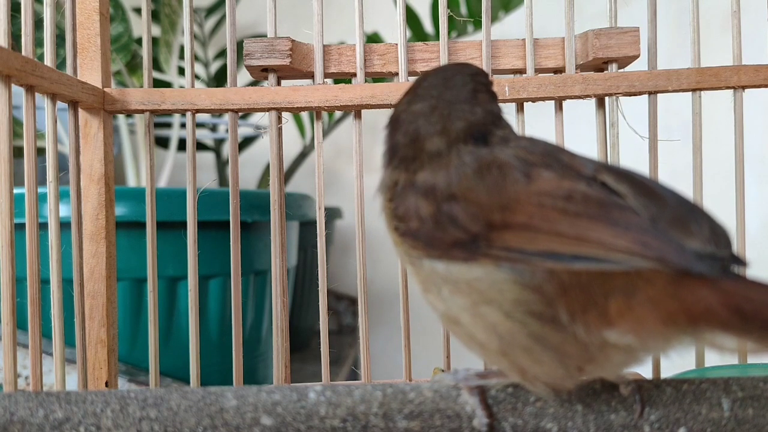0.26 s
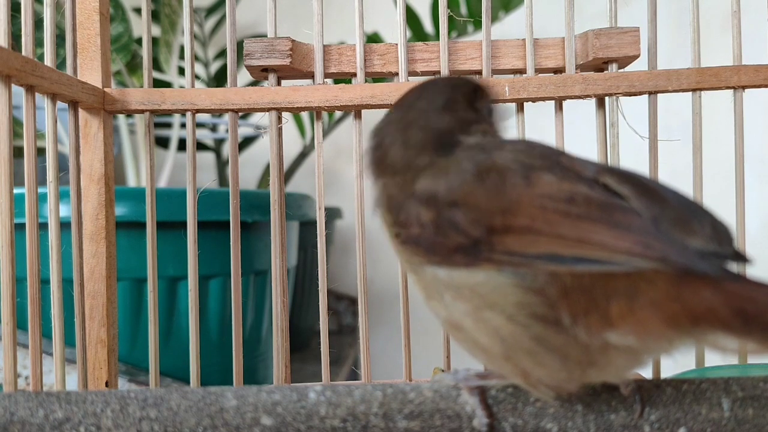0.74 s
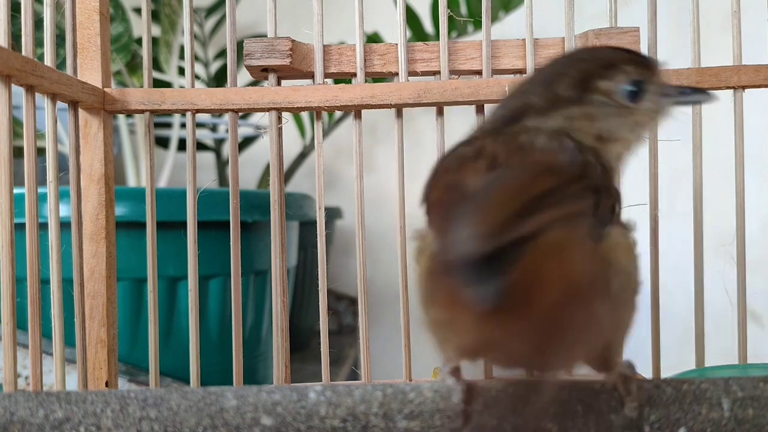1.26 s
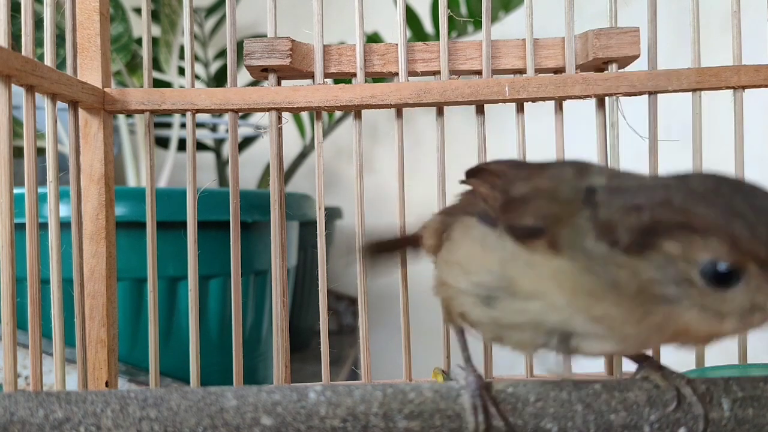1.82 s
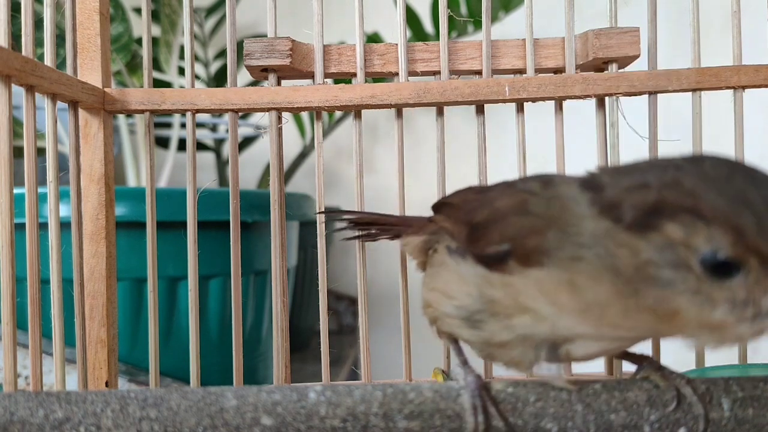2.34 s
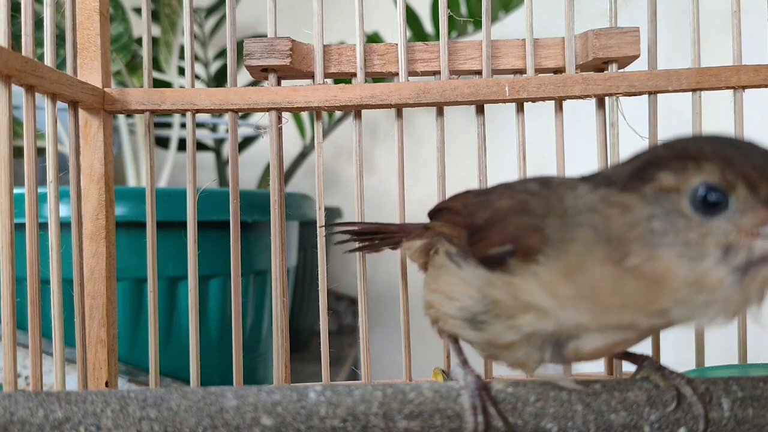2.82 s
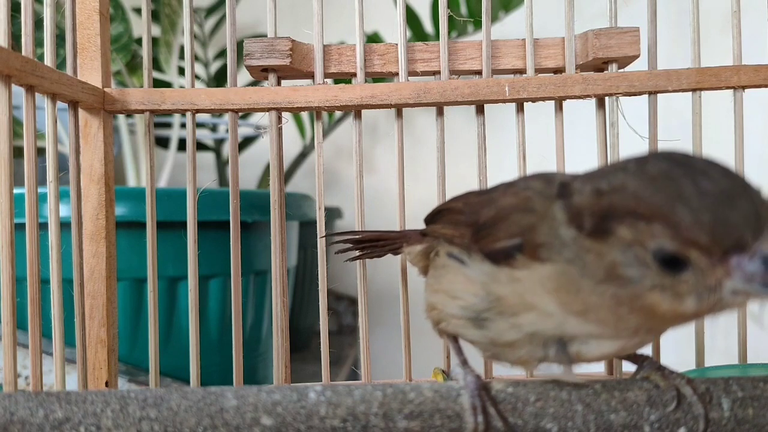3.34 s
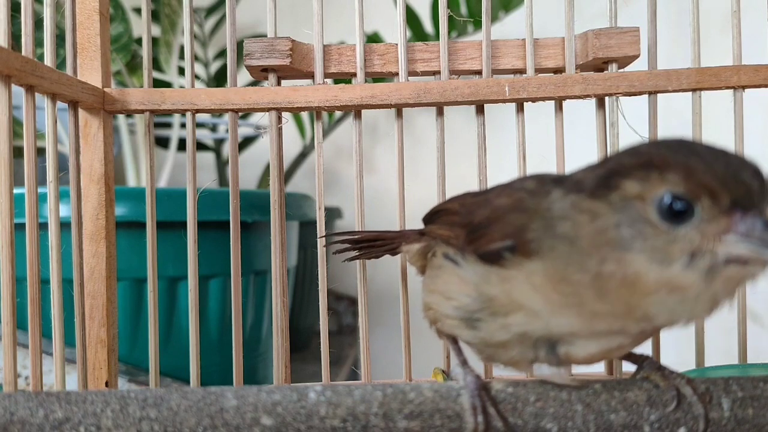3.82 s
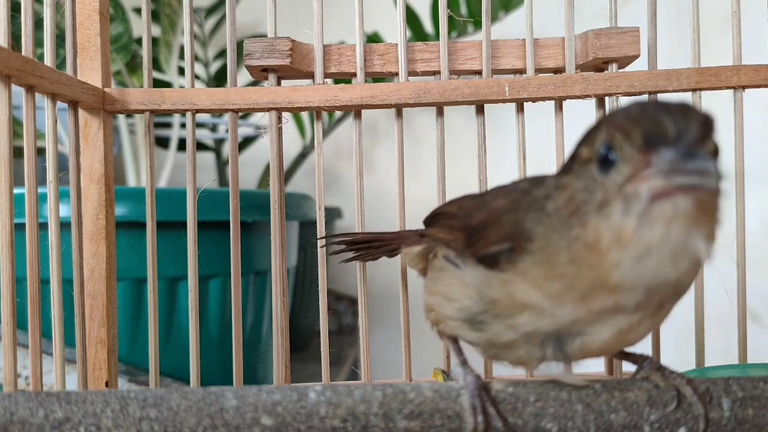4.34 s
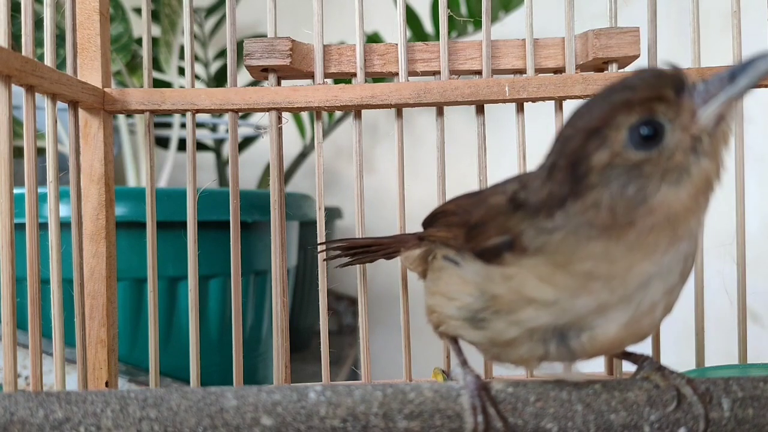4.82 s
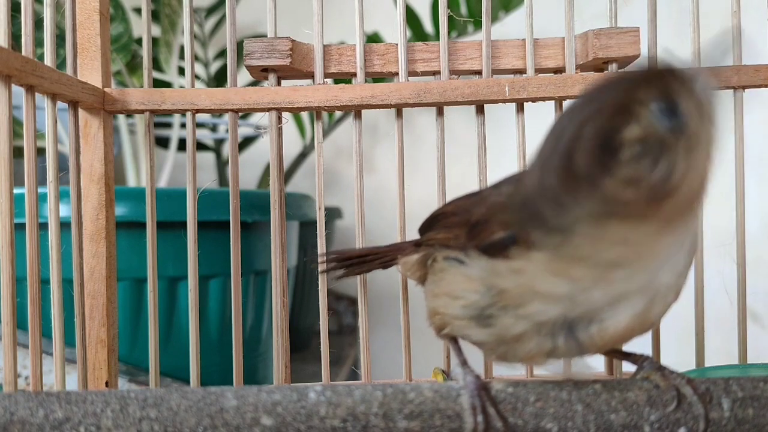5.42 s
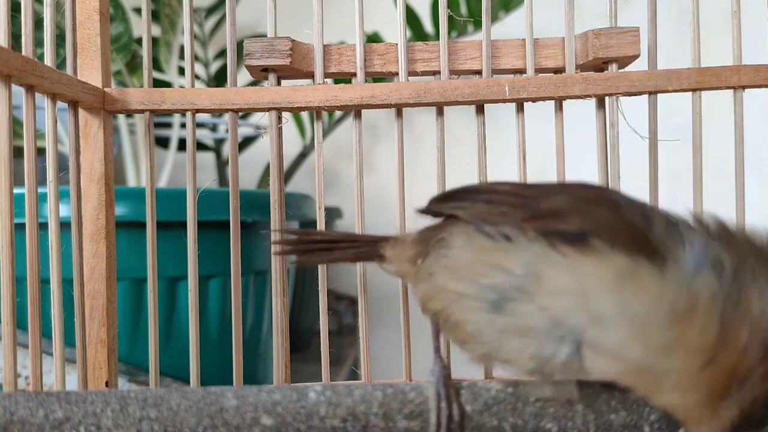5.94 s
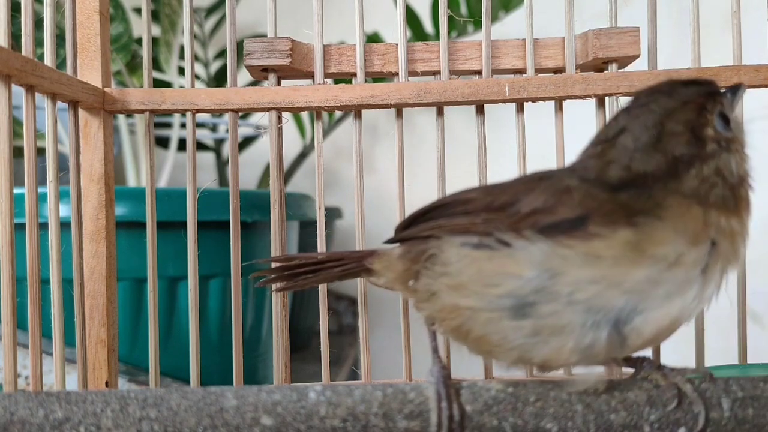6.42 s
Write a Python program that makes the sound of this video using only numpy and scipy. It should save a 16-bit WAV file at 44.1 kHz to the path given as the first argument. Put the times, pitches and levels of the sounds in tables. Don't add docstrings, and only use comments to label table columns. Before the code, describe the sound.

A small caged bird close by bursts into two loud, piercing rattling trills with buzzing ends, over faint distant whistles and low dragging rumbles.

```python
import sys
import numpy as np
from scipy import signal
from scipy.fft import rfft, irfft, next_fast_len
from scipy.io import wavfile
from scipy.ndimage import uniform_filter1d, map_coordinates

SR = 44100
rng = np.random.default_rng(int(sys.argv[2]) if len(sys.argv) > 2 else 0)


def makeup_ratio(level_db):
    decades = np.asarray(level_db, float) / 20
    return 10 ** decades


def unload_wav(signal):
    wavfile.write(
        sys.argv[1],
        SR,
        np.round(np.clip(np.atleast_2d(signal).T, -1, 1) * 32767).astype(np.int16),
    )


N = 294147


def lead_level_db(shelf_hz, shelf_db):
    rest_hz = 2218
    return shelf_db - 11 + 4.5 * np.log2(max(shelf_hz - rest_hz, 50) / 400)


def lead_in(t, hz, gain, note, stress):
    leap_s, lead_s, shelf_hz, _, _ = note
    shelf_db, step_db, _, _, _ = stress
    i = (t > leap_s - lead_s - .002) & (t <= leap_s)
    u = np.clip(1 + (t[i] - leap_s) / (lead_s + 0.0026), 0, 1)
    step_hz = 0.5 * max(shelf_hz - 2600, 0)
    step = .5 + .5 * np.tanh((t[i] - leap_s + .0105) / .0015)
    fresh = gain[(t > leap_s - lead_s - .008) & (t < leap_s - lead_s)].max() < makeup_ratio(-45)
    tied = not fresh
    scoop = min(500 + 4 * step_hz, 1400) * np.exp(-u / 0.065) * fresh
    climb = np.sin(1.3 * u) / np.sin(1.3) if fresh else np.sin(np.pi * u / 2) ** 1.5
    floor_hz = 2220 if fresh else 2330
    falling_hz = (gain[i] > 0) * hz[i]
    rising_hz = floor_hz + (shelf_hz - step_hz - floor_hz) * climb + step_hz * step - scoop
    hz[i] = np.maximum(falling_hz, rising_hz)
    strain_db = np.maximum(hz[i] - 3300, 0) / 85 * (falling_hz < hz[i])
    level_db = lead_level_db(shelf_hz, shelf_db) - strain_db + 3.04 * (u - 3.0) + step_db * (step - 1)
    attack_share = .5 - 0.22 * min(step_hz / 150, 1)
    attack = np.minimum(u / attack_share + .2 * tied, 1) ** 0.87
    gain[i] = np.maximum(gain[i], makeup_ratio(level_db) * attack * makeup_ratio(-1.5 * tied))


def hook(t, hz, gain, note, stress):
    leap_s, lead_s, shelf_hz, top_hz, hook_db = note
    shelf_db, _, leap_db, arc_s, catch_db = stress
    i = (t > leap_s) & (t < leap_s + arc_s)
    u = np.clip((t[i] - leap_s) / arc_s, 0, 1)
    base_hz = shelf_hz + (2350 - shelf_hz) * u
    hz[i] = base_hz + (top_hz - base_hz + 150) * np.sin(np.pi * u ** .8)
    throat_dip_db = 7 * np.exp(-((shelf_hz - 3120) / 280) ** 2)
    burst_db = lead_level_db(shelf_hz, shelf_db) + leap_db + 2.0 - 0.002 * (shelf_hz - 2500.5) - throat_dip_db
    held = makeup_ratio(hook_db - (10 + 1500 * max(lead_s - .0185, 0)) * u)
    gain[i] = held + makeup_ratio(burst_db) * np.exp(-u / 0.057)
    gain[i] += makeup_ratio(catch_db) * np.exp(-((u - .86) / .09) ** 2)
    gain[i] *= np.minimum((1 - u) / 0.07, 1)


# t/s at the top, top f/Hz, level/dB
REBOUNDS = [
    (3.871, 3000, -32),
    (3.973, 3250, -27.5),
    (4.043, 3150, -29),
    (4.345, 3000, -32),
]


def rebound(t, hz, gain):
    half_s, rest_hz = .007, 2218
    for s, top_hz, db in REBOUNDS:
        i = abs(t - s) < half_s
        hump = np.cos(np.pi / 2 * (t[i] - s) / half_s)
        hz[i] = rest_hz + (top_hz - rest_hz) * hump
        gain[i] = makeup_ratio(db) * hump ** 1.5


# first crest t/s, last crest t/s
BUZZES = [
    (3.0465, 3.1042),
    (3.1635, 3.2313),
    (4.494, 4.518),
    (4.568, 4.641),
    (4.7055, 4.7738),
]
# first crest f/Hz, last crest f/Hz, first level/dB, loudest level/dB
EFFORT = [
    (4637, 5200, -18, -8),
    (3920, 5600, -22, -9),
    (4300, 4100, -19, -14.5),
    (4010, 5500, -18, -9),
    (4010, 5600, -19, -10),
]
WAIST_DB = [
    11,
    14,
    25,
    30,
    30,
]


def buzz(t, hz, gain, edge):
    for (first, last), (first_hz, last_hz, first_db, last_db), waist_db in zip(BUZZES, EFFORT, WAIST_DB):
        i = (t > first - .0055) & (t < last + .005)
        u = (t[i] - first) / (last - first)
        done = np.clip(u, 0, 1)
        swings = round((last - first) * 119)
        crest = .5 + .5 * np.cos(2 * np.pi * swings * (u + .05 * u * (1 - u)))
        uneven_hz = 90 * rng.standard_normal(12)[np.clip(u * swings + 1.5, 0, 11).astype(int)]
        crest_hz = first_hz + (last_hz - first_hz) * u
        hz[i] = uneven_hz + 3150 + (crest_hz - 3150) * crest ** .9
        fade = np.clip(np.minimum(t[i] - first + 0.0046, last + .005 - t[i]) / 0.0039, 0, 1)
        spent_db = 11 * crest * (u > 1 - .5 / swings)
        growth_db = (last_db - first_db) * np.clip(1.5 * u, 0, 1) * (0.27 + .7 * crest ** 2)
        dip_db = waist_db * crest * (1 - crest) + 5 * done * (1 - crest) ** 2
        gain[i] = makeup_ratio(first_db + growth_db - spent_db - dip_db) * fade
        gain[i] *= makeup_ratio(1.2 * rng.standard_normal(24)[np.clip(2 * u * swings + 2.5, 0, 23).astype(int)])
        pressed_db = -19.5 + .7 * (last_db + 6) - 6.6 * (last - first < .06)
        edge[i] = makeup_ratio(pressed_db + 19.6 * np.clip(1.8 * u, 0, 1) - 16 * crest + 3 * done)


# t/s of the upward leap, lead-in t/s, shelf f/Hz, top f/Hz, hook level/dB
FIRST_TRILL = [(2.3313, 0.019, 2422, 5310, -33), (2.378, 0.02, 2528, 5970, -27.5),
               (2.4464, 0.02, 3618, 6550, -11.5), (2.516, 0.019, 3790, 6513, -12.5),
               (2.5601, .0259, 3273, 6368, -21.5), (2.6361, 0.021, 3618, 6320, -14.5),
               (2.6809, 0.024, 3239, 6324, -23.5), (2.756, .0175, 3531, 6238, -18),
               (2.7999, .0257, 3101, 6330, -24), (2.8715, 0.019, 3575, 6317, -19.5),
               (2.9164, .0252, 2842, 6190, -25), (2.9888, 0.015, 2990, 6050, -23),
               (3.0264, 0.016, 2515, 5680, -27)]
SECOND_TRILL = [(3.8392, .0187, 2425, 5470, -29.5), (3.8891, .018, 2414, 5560, -26),
                (3.941, .027, 2484, 5854, -26), (4.0137, .0237, 2593, 5730, -20),
                (4.0915, .0225, 3077, 6030, -28), (4.1365, .0262, 2584, 5598, -33),
                (4.2152, .0187, 3000, 5555, -30), (4.262, .0257, 2662, 5596, -32),
                (4.3152, .0264, 2683, 5967, -31), (4.3979, .0185, 3178, 6034, -30),
                (4.442, .023, 2862, 5724, -28), (4.4805, .015, 2475, 5247, -24)]
# shelf level/dB, step up level/dB, leap level/dB, hook length t/s, catch level/dB
FIRST_STRESS = [(-1.1, 3, -2.1, .019, -34), (-1.6, 2, 0.1, .02, -34), (1.1, 8, -1.1, .02, -20),
                (2.1, 9, -2.1, .0175, -20), (1.6, 9, -3.1, .021, -32), (1.1, 9, -1.1, .019, -21),
                (1.1, 9, -3.1, .021, -30), (0.1, 8, -1.1, .02, -22), (0.1, 7, -2.1, .021, -30),
                (0.1, 8, -1.1, .02, -23), (-1.1, 3, 0.1, .021, -30), (1.1, 8, -2.1, .02, -25),
                (-1.1, 0.1, -2.1, .019, -24)]
SECOND_STRESS = [(0.1, 0.1, -2.1, .021, -31), (0.1, 0.1, -1.1, .021, -26), (0.1, 0.1, 0.1, .022, -24),
                 (1.1, 0.1, -4.1, .021, -23), (-0.6, 9, -3.1, .0195, -23), (-1.1, 0.1, -3.1, .02, -34),
                 (-0.6, 6, -2.1, .02, -23), (-1.1, 1.1, -4.1, .02, -18), (0.1, 1.1, -5.1, .021, -27),
                 (-0.6, 12, -3.1, .021, -24), (0.1, 5, 1.1, .024, -20), (-1.1, 0.1, 0.1, .017, -30)]


def syrinx():
    t = np.arange(N) / SR
    hz, gain, edge = np.full(N, 2350.), np.zeros(N), np.full(N, makeup_ratio(-29))
    for note, stress in zip(FIRST_TRILL + SECOND_TRILL, FIRST_STRESS + SECOND_STRESS):
        lead_in(t, hz, gain, note, stress)
        hook(t, hz, gain, note, stress)
    rebound(t, hz, gain)
    buzz(t, hz, gain, edge)
    return uniform_filter1d(hz, size=31), uniform_filter1d(gain, size=25), edge


def second_voice():
    x, u = np.zeros(N), np.linspace(0, 1, int(.032 * SR))
    for s, _, _, _, _ in FIRST_TRILL + SECOND_TRILL:
        hz = 3000 - 997.3 * np.sin(1.25 * np.pi * u ** 1.6 / 2) ** 2 + rng.normal(0, 70)
        level = makeup_ratio(-35 + rng.normal(0, 2))
        x[round((s + .003) * SR):][:len(u)] += level * np.sin(np.pi * u ** .5) * np.sin(turns(hz))
    return x * makeup_ratio(4 * wobble(250))


# f/Hz, width f/Hz, level/dB
THROAT = [
    (3150, 450, 3),
    (5290, 1400, -4),
    (6725, 2000, 0),
]
# f/Hz, level/dB
MIC = [(400, -20.5), (1300, -4), (2400, -1), (7000, -2.5), (8500, 1.5), (10000, -14), (11500, -9.5),
       (13000, -8.5), (15600, -7.5), (16200, -41)]


def bird():
    hz, gain, edge = syrinx()
    phase = turns(hz * (1 + 0.0089 * wobble(500)))
    tone = np.sin(phase)
    tone += edge * np.sin(2 * phase + .8 * wobble(600))
    tone += (makeup_ratio(-30) + edge ** 2.0) * np.sin(3 * phase)
    tone += .3 * edge * np.sin(4 * phase) * (hz < 4500)
    tone += makeup_ratio(-35.5) * np.sin(5 * phase) * (hz < 3600)
    breath = (makeup_ratio(-30.5) + 0.58 * edge) * rng.standard_normal(N)
    voice = makeup_ratio(3.5) * gain * makeup_ratio(.5 * wobble(300)) * (tone + breath) + second_voice()

    def throat(f):
        return makeup_ratio(-2) + sum(makeup_ratio(db) * 1j * f * w / (c * c - f * f + 1j * f * w) for c, w, db in THROAT)

    return filtered(voice, lambda f: throat(f) * makeup_ratio(along(MIC, f)))


# (from t/s, to t/s, left lag/samples), then rows of f/Hz, left level/dB, right level/dB
POSES = [
    ((2.2, 3.14, 2.2), [(2400, -2.5, 2), (3050, -1, -1), (3700, 2, -5), (4500, 1, 1.5), (5400, 2.5, 1), (6400, 4, -3), (7750, -1, 5), (9500, -14, 4), (11700, -3, 0), (14500, 3, 0)]),
    ((3.14, 3.6, 2.7), [(2400, -1, 3), (3050, 0, -1), (3700, 1, -2), (4500, 3, 1), (5400, 5, 3.5), (6400, 11, 3), (7750, 2, 10), (9500, -3, 11), (11700, 2, 10), (14500, -3, -3)]),
    ((3.6, 4.55, 4.4), [(2400, -2.5, 2.5), (3050, -4, -2.5), (3700, 4, 0), (4500, 1, 1.5), (5400, 2.5, 1), (6400, -2, -3.5), (7750, -5, 3), (9500, -11, 3), (11700, -7, 3), (14500, -1, 3)]),
    ((4.55, 5.0, 5.4), [(2400, 1, 2.5), (3050, -4, -6), (3700, -1, 0), (4500, -1, 4), (5400, 6, 5), (6400, 4, -2), (7750, -4, 6), (9500, -10, 10), (11700, -3, 9), (14500, -8, 3)]),
]
# f/Hz, phase/rad
PORTS = [(2400, .3), (3050, -1.2), (3700, 0), (4500, -.4), (5400, -.4), (6400, 0)]


def facing(x):
    t, out, ears = np.arange(N) / SR, np.zeros((2, N)), np.array([[.5], [-.5]])
    for (start, end, lag), colour in POSES:
        def port_response(f):
            gains = makeup_ratio([along([(row[0], row[k]) for row in colour], f) for k in (1, 2)])
            return gains * np.exp(-1j * ears * (2 * np.pi * f * lag / SR + along(PORTS, f)))

        out += filtered(x * ((t >= start) & (t < end)), port_response)
    return out


# f/Hz, density level/dB per Hz
SHEEN = [(5000, -59.5), (7500, -5), (9500, -0.5), (10300, -11.5), (11000, -4.5), (12800, -3.5),
         (13700, -10), (15200, -1), (16000, -39.5)]


def fizz(song):
    loudness = np.sqrt(np.abs(uniform_filter1d(song ** 2, size=1800, origin=600)))
    return makeup_ratio(-15) * loudness ** 2.1 * rush(lambda f: makeup_ratio(along(SHEEN, f)), patchy_db=8)


# delay t/s, level/dB
BARS = [(.0011, -12), (.0023, -4.5), (.0042, -6), (.0068, -11.5), (.0097, -16.5), (.014, -12.5),
        (.019, -19)]


def cage(x):
    delay, db = np.transpose(BARS)
    spread = delay[:, None] * rng.uniform(.8, 1.3, (len(BARS), 2))
    signs = rng.choice([-1, 1], (len(BARS), 2))

    def echoes(f):
        return sum(makeup_ratio(d) * g[:, None] * np.exp(-2j * np.pi * f * s[:, None]) for d, g, s in zip(db, signs, spread))

    return filtered(x, echoes)


# f/Hz, t/s
YARD = [(700, .2), (1500, 0.48), (3000, 0.37), (6000, 0.43), (12000, 0.4)]


def yard(x, gap_s):
    hz, t, z = signal.stft(rng.standard_normal((2, SR // 2)), SR, nperseg=256)
    tail = signal.istft(z * makeup_ratio(-60 * t / along(YARD, hz)[:, None]), SR, nperseg=256)[1]
    late = np.pad(x, (int(gap_s * SR), 0))[None]
    return signal.fftconvolve(late, tail / np.linalg.norm(tail[0]), axes=1)[:, :N]


# f/Hz, level/dB
WALLS = [(1500, -14.5), (3000, -17), (5000, -16), (8000, -8), (12000, -11)]


def wall_answer(song):
    answer = filtered(yard(song, .006), lambda f: makeup_ratio(along(WALLS, f)))
    return makeup_ratio(3.7 * np.array([wobble(45), wobble(45)])) * answer


# t/s at full force, hold t/s, rumble level/dB, scrape level/dB above it, bass level/dB above it
DRAG = [(.24, .03, -79.5, 0.5, -5), (.9, .02, -80, -10, -6), (1.45, 0.19, -67, -13.5, -10),
        (1.68, 0.079, -69, -6, -10), (1.9, .02, -62, -16, -17), (2.05, .01, -72, -31, -8),
        (2.97, .04, -46.5, -8.5, -16.5), (3.42, 0.06, -47, -21, -17), (3.79, 0.06, -46, -14, -28),
        (4.11, 0.044, -42.5, -9, -19), (4.42, .1, -41, -14, -18), (4.82, 0.093, -45, -12.5, -13),
        (5.23, 0.057, -44.5, -19, -14), (5.69, .1, -42, -14, -23.5), (6.1, .09, -40.5, -16, -22),
        (6.52, .07, -40, -17.5, -18.5)]
LEAKS = [
    (2.33, .9, -52.5, -1, -11),
    (3.84, 0.94, -52, -3.5, -8),
]
# f/Hz, density level/dB per Hz
RUMBLE = [(44, -39.5), (75, -6.5), (151, -6), (193, -2), (231, -4), (322, -6.5), (360, -6.5), (439, -5.5),
          (900, -16), (1170, -50.5), (1980, -120)]
SCRAPE = [(290, -34), (500, -15.5), (969, -9), (1130, -8.5), (1790, -6.5), (2520, -11), (3850, -27.5),
          (4500, -26), (5850, -57.5), (9900, -120)]
DEEP = [(15, -19.5), (30, -7), (55, -2.5), (80, 0.5), (120, -19.5), (250, -91)]
# f/Hz, width f/Hz, level/dB over the rumble
SLAB = [
    (196, 6, 3.5),
    (282.8, 18, 1),
    (324.2, 6.9, 8.5),
    (436, 8.3, -1.5),
]


def dragging():
    force = np.zeros((3, N))
    for rows, rise_s, fall_db in (DRAG, .14, 75), (LEAKS, .06, 110):
        for s, hold_s, db, scrape_db, bass_db in rows:
            push = swell(s, rise_s, hold_s, fall_db, db)
            grate = swell(s + .023, rise_s, hold_s, 1.09 * fall_db, db + scrape_db)
            force += np.array([push, grate, makeup_ratio(bass_db - 2) * push]) ** 2

    def rings(f):
        return 1 + sum(makeup_ratio(db) / (1 + (2 * (f - c) / w) ** 2) for c, w, db in SLAB)

    rumble = rush(lambda f: makeup_ratio(along(RUMBLE, f)) * rings(f), patchy_db=1.0)
    scrape = rush(lambda f: makeup_ratio(along(SCRAPE, f)), patchy_db=1.5)
    bass = rush(lambda f: makeup_ratio(along(DEEP, f)), patchy_db=2.0)
    low, high, deep = np.sqrt(force) * makeup_ratio([1.5 * wobble(18), 2.0 * wobble(18), 2.5 * wobble(8.9)])
    steady_bass = makeup_ratio(-87 + 3 * wobble(4))
    return makeup_ratio(-1.16) * low * rumble + makeup_ratio(5.5) * high * scrape + (deep + steady_bass) * bass


# t/s, peak level/dB, f/Hz
TICKS = [(0.259, -61, 7100), (1.39, -66, 2050), (1.51, -69, 1450), (1.835, -52.5, 9000), (1.878, -50, 900),
         (5.657, -55.5, 8530), (5.717, -61, 6480), (5.73, -60.5, 6993), (6.061, -54.5, 8150),
         (6.139, -50, 8060), (6.149, -51.5, 10010)]


def claws():
    x, t = np.zeros(N + SR), np.arange(SR // 30) / SR
    for s, db, hz in TICKS:
        crack = 0.37 * (hz > 4000) * rng.standard_normal(len(t))
        decay = makeup_ratio(db - 60 * t / (0.013 + 60 / hz))
        x[round(s * SR):][:len(t)] += decay * (np.sin(2 * np.pi * hz * t) + crack)
    return filtered(x[:N], lambda f: (f > 500) * makeup_ratio(along(MIC, f))) * [[1.1], [.9]]


# t/s, length t/s, first f/Hz, settled f/Hz, level/dB
WHISTLE = [
    (.78, 0.09, 3250, 3200, -55),
    (1.0, .17, 3310, 3150, -55),
    (1.28, 0.22, 3270, 3090, -49.5),
    (1.585, .24, 3300, 3030, -55),
    (1.92, .12, 3270, 2990, -59),
]
COO = [
    (.69, 0.11, 935, 870, -56),
    (1.736, .24, 700, 719, -57),
    (2.08, .2, 724, 727, -74.5),
]
PEEP = (6.155, .07, 6150, 6030, -49)
HORN = (.0, 0.25, 344, 340, -68.5)
HUM = (2.74, .12, 211, 204, -53)
# f/Hz, level/dB
BELL = [(340, -22), (680, 3.5), (1020, -1), (1360, -1), (1700, -8), (2050, 3.5), (2400, -12.5),
        (2800, -36.5), (3100, -36), (3400, -28.5), (3750, -18.5)]


def far_calls():
    x = np.zeros(N)
    flutter, waver_hz = makeup_ratio(2 + 4 * wobble(40)), 15 * wobble(60)
    for note in WHISTLE:
        hz, gain = glide(note, 0.044, 300)
        x += gain * flutter * np.sin(turns(hz + waver_hz))
    flutter, waver_hz = makeup_ratio(3.5 * wobble(40)), 50 * wobble(60)
    for note in COO:
        hz, gain = glide(note, 0.06, 250)
        x += gain * flutter * np.sin(turns(hz + waver_hz))
    hz, gain = glide(PEEP, .02, 75)
    x += gain * makeup_ratio(2.5 * wobble(90)) * np.sin(turns(hz + 260 * wobble(300)))
    hz, gain = glide(HORN, .03, 125)
    phase = turns(hz - 70 * np.arange(N) / SR)
    horn = np.zeros(N)
    for k, (_, level_db) in enumerate(BELL):
        horn += makeup_ratio(level_db + 3.5 * wobble(38.2)) * np.sin((k + 1) * phase + 2.16 * wobble(60.0))
    horn *= makeup_ratio(-1.0) * gain
    hz, gain = glide(HUM, .1, 250)
    hum = makeup_ratio(4.0) * gain * np.sin(turns(hz))
    direct = makeup_ratio(2.5) * (x * [[1.05], [-.75]] + horn * [[.8], [.95]])
    return direct + makeup_ratio(-1.0) * yard(x + horn, 0.017) + hum


# t/s fully open, rise t/s over 30 dB, hold t/s, fall/dB per s, hiss level/dB
PUFFS = [
    (0.093, 0.4, 0.35, 100, -79.5),
    (0.665, 0.25, 0.16, 187, -68),
    (1.52, 0.2, 0.11, 60, -77.5),
    (1.723, 0.44, 0.084, 118, -67.5),
    (5.103, 1.2, .02, 60, -71.5),
    (5.72, .5, .04, 55, -70.5),
    (6.146, 0.02, 0.01, 400, -56.5),
    (6.17, 0.8, .02, 85, -70),
    (6.522, .06, .2, 59.5, -79),
]
# f/Hz, density level/dB per Hz
HISS = [(760, -43.5), (1300, -13), (1660, -19), (1990, -5), (2410, -9), (3320, -11), (4130, -12.5),
        (6820, -1.5), (8720, -5), (12500, -22), (16200, -50.5), (22000, -120)]


def hiss():
    level = np.sqrt(sum(swell(*puff) ** 2 for puff in PUFFS))
    return makeup_ratio(6.5) * level * rush(lambda f: makeup_ratio(along(HISS, f)), patchy_db=4.5)


# f/Hz, density level/dB per Hz
TRAFFIC = [(53, -28.5), (90, 2), (427, -12), (465, -10.5), (788, -25.5), (2500, -26.5), (3250, -56),
           (5500, -120)]


def traffic():
    return makeup_ratio(-83) * rush(lambda f: makeup_ratio(along(TRAFFIC, f)), patchy_db=2.5)


# f/Hz, correlation/1
ALIKE = [(40, .78), (300, .78), (640, .4), (1400, -.1), (3000, 0)]


def rush(gain, patchy_db):
    z = signal.stft(rng.standard_normal((2, N)).astype(np.float32), nperseg=512)[2]
    field = uniform_filter1d(rng.standard_normal(z.shape[1:]), size=5, axis=0)
    field = uniform_filter1d(field, size=8, axis=1)
    pair = signal.istft(z * makeup_ratio(patchy_db * unit(field)).astype(np.float32), nperseg=512)[1][:, :N]

    def mid_side(hz):
        angle = np.arccos(np.clip(along(ALIKE, hz), -1, 1)) / 2
        return gain(hz) * [np.cos(angle), np.sin(angle)]

    mid, side = filtered(pair, mid_side)
    return unit(np.array([mid + side, mid - side]))


def glide(note, rise_s, fall_db):
    s, length_s, first_hz, last_hz, db = note
    t = np.maximum(np.arange(N) / SR - s, 0)
    return last_hz + (first_hz - last_hz) * np.exp(-t / .06), swell(s, rise_s, length_s, fall_db, db)


def swell(s, rise_s, hold_s, fall_db, db):
    t = np.arange(0, N + 32, 32) / SR - s
    return smooth(makeup_ratio(db - 30 * np.maximum(-t, 0) / rise_s - fall_db * np.maximum(t - hold_s, 0)))


def wobble(rate):
    knots = rng.standard_normal(int(N * rate / SR) + 4)
    return smooth(map_coordinates(knots, [np.arange(0, N + 32, 32) * rate / SR]))


def smooth(knots):
    return np.interp(np.arange(N), np.arange(len(knots)) * 32, knots)


def turns(hz):
    return 2 * np.pi * np.cumsum(hz) / SR


def filtered(x, response):
    m = next_fast_len(N + SR // 2)
    return irfft(rfft(x, m) * response(np.fft.rfftfreq(m, 1 / SR)), m)[..., :N]


def along(points, hz):
    f, v = np.transpose(points)
    return np.interp(np.log(hz + 1), np.log(f + 1), v)


def unit(x):
    return x / np.sqrt(np.mean(x ** 2) + 1e-20)


def scene():
    song = bird()
    near = facing(song) + makeup_ratio(-9) * cage(song) + fizz(song)
    return near + wall_answer(song) + dragging() + claws() + far_calls() + hiss() + traffic()


# f/Hz, threshold/spreads
GAPS = [(5800, -4), (6600, -1.2), (9500, -1.3), (10500, -.4), (14000, -.3), (16000, .3)]


def thin_treble(x):
    hz, _, z = signal.stft(x.astype(np.float32), SR, nperseg=512)
    field = uniform_filter1d(rng.standard_normal(z.shape[1:]), size=7, axis=0)
    field = unit(uniform_filter1d(field, size=9, axis=1))
    treble_db = 10 * np.log10(np.mean(abs(z[:, hz > 6000]) ** 2, axis=(0, 1)) + 1e-12)
    opening = np.maximum(treble_db + 68, 0) / 7
    kept = .5 + .5 * np.tanh((field + opening - along(GAPS, hz)[:, None]) / .15)
    return signal.istft(z * np.maximum(kept, makeup_ratio(-28)), SR, nperseg=512)[1][:, :N]


def roll_off(x):
    return signal.sosfilt(signal.butter(12, 20000, fs=SR, output="sos"), x)


def record(dry):
    kept = thin_treble(dry)
    mix = kept / (1 + np.abs(kept) ** 8) ** (1 / 8)
    return roll_off(mix)


dry = scene()
out = record(dry)
unload_wav(out)
```